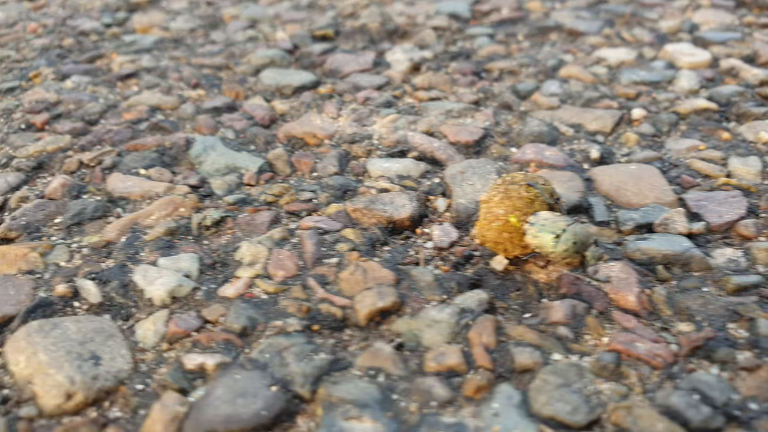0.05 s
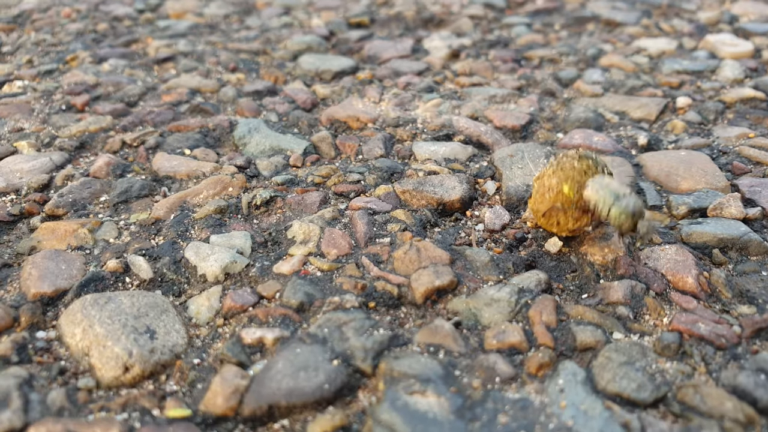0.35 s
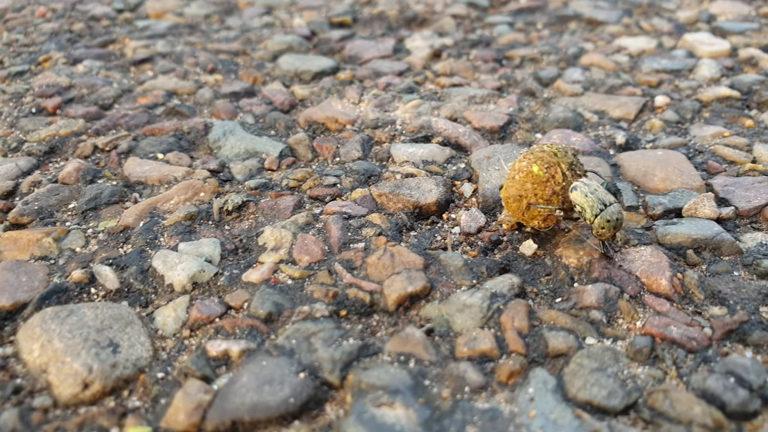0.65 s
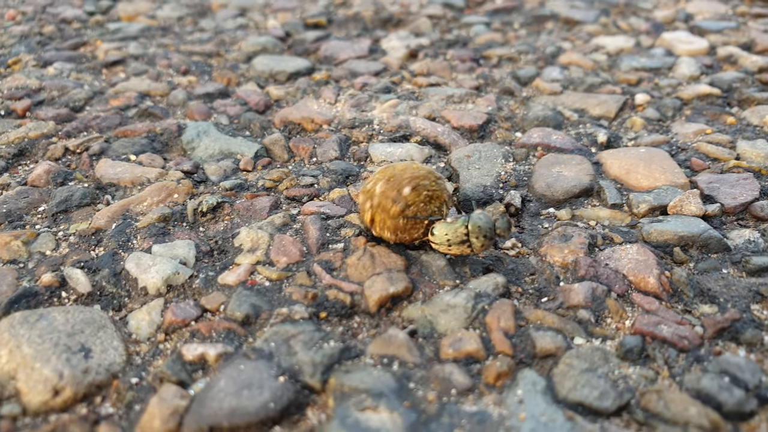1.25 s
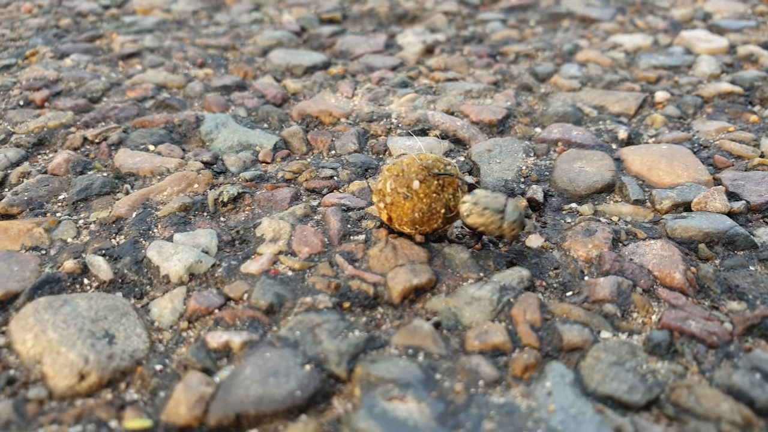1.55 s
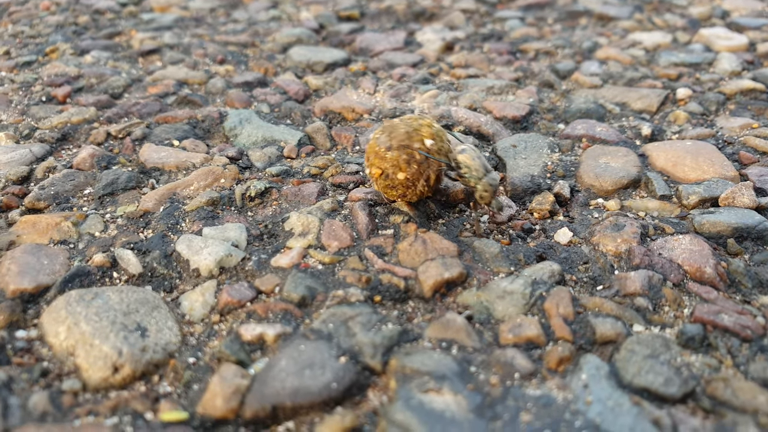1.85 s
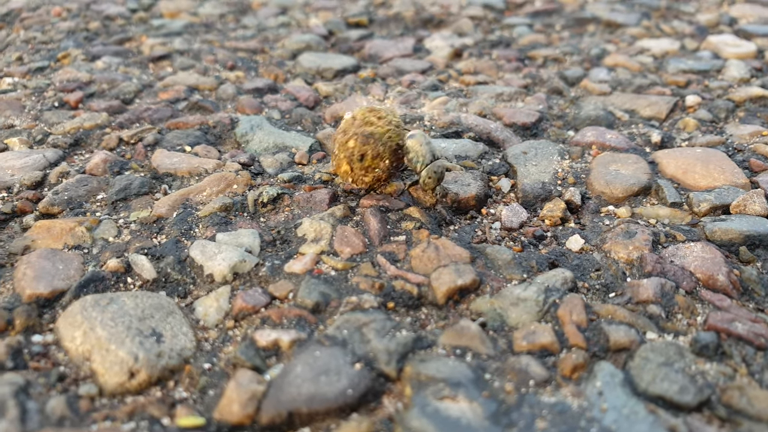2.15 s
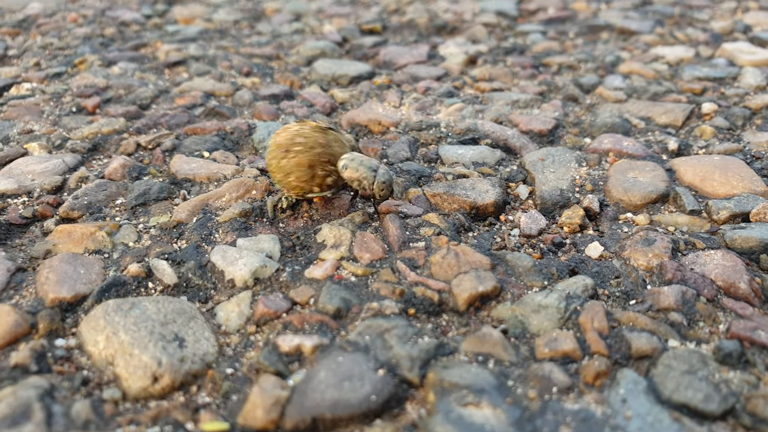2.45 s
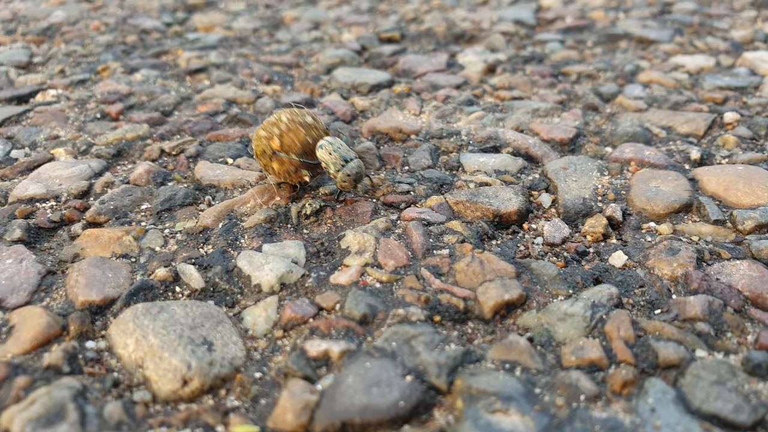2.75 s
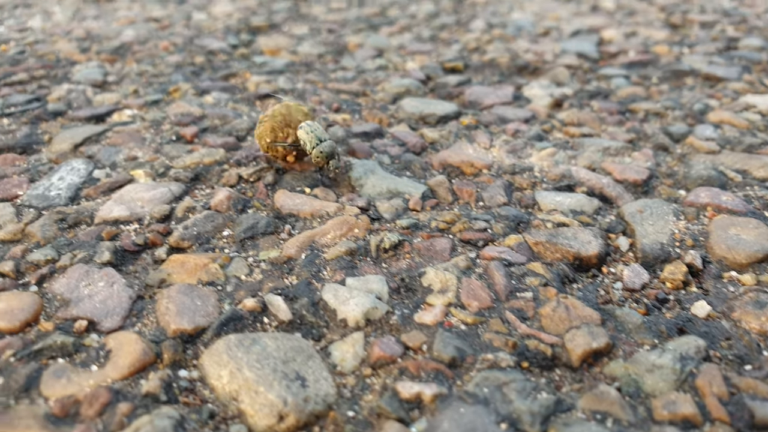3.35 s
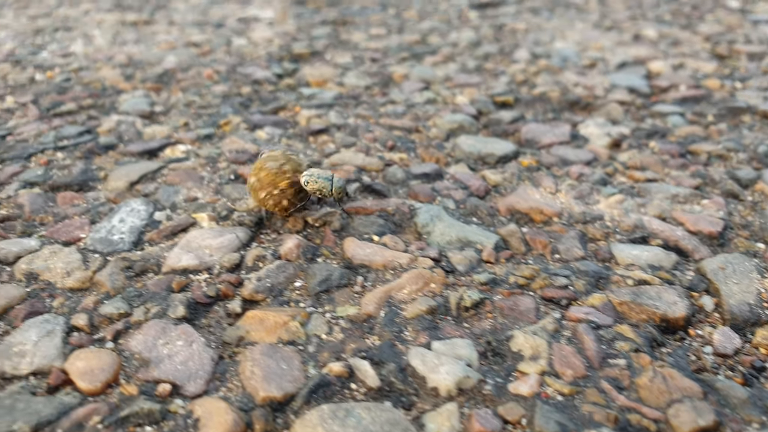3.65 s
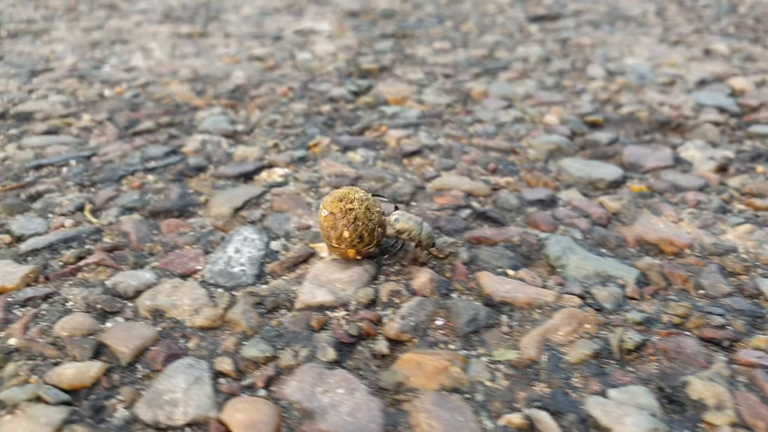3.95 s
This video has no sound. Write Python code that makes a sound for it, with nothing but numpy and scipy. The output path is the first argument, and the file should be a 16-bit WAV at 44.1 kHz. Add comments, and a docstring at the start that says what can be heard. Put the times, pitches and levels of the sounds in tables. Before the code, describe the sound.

The low, rapid thudding of an approaching engine grows louder with mechanical clatter, tyre noise and a passing whine. Before it builds, a small bird gives quick high chirps and two rising calls. Low microphones catch open-air hiss behind.

```python
"""A slow-running engine approaches on a rough country road, drawing left of two low microphones. Its exhaust
thuds about 32 times a second, once per firing, with mechanical clatter, a passing whine and the roar of tyres
on top. Before it swells, a small bird off to the right whistles a run of short chirps and two rising calls.
Behind lie distant rumble, the open air and far traffic."""
import sys
import numpy as np
from scipy import signal
from scipy.fft import rfft, irfft
from scipy.io import wavfile
from scipy.ndimage import uniform_filter1d, map_coordinates

SR = 44100
rng = np.random.default_rng(int(sys.argv[2]) if len(sys.argv) > 2 else 0)


def wav_record(signal):
    """Record a signal, one row per channel, as 16-bit PCM in the file named by sys.argv[1]."""
    frames = np.transpose(np.atleast_2d(signal))
    bounded = np.clip(frames, -1, 1)
    # unit amplitude maps onto the largest positive 16-bit level
    quanta = np.round(bounded * 32767).astype(np.int16)
    wavfile.write(sys.argv[1], SR, quanta)


N = 176400

# engine speed (time [s], firing rate [Hz])
FIRING_RATE = [(0, 30.6), (2.2, 30.8), (2.6, 31.55), (3.1, 31.8), (3.6, 32.0), (4, 32.7)]
# the engine drawing near (time [s], exhaust level [dB], clatter level [dB])
APPROACH_LEVELS = [(0, -64.5, -63.5), (1.0, -55, -58.5), (1.85, -54.5, -57), (2.15, -45.5, -49.5),
                   (2.45, -41, -44), (2.85, -36, -39.5), (3.25, -31, -35.5), (3.55, -32.5, -37.5),
                   (4, -30.5, -37)]
# the vehicle's bearing (time [s], lead of the left microphone [ms])
LEFT_LEAD = [(0, .1), (2, .19), (2.9, .28), (3.2, .38), (4, .45)]
# one thud through the silencer (frequency [Hz], relative level [dB])
THUD_SPECTRUM = [(20, -20), (42, -28), (63, 2), (95, -2.5), (128, 0.5), (160, -8), (192, -2), (255, -8),
                 (300, -18), (390, -13.5), (600, -32), (1200, -40), (4000, -64)]
# diffuse exhaust rumble (frequency [Hz], relative level [dB])
RUMBLE_SPECTRUM = [(20, -22), (42, -15.5), (65, -3), (92, -2.5), (130, -9), (200, -8.5), (300, -20.5),
                   (420, -12), (600, -35), (2000, -59)]
# mechanical clatter (frequency [Hz], relative level [dB])
CLATTER_SPECTRUM = [(60, -16), (200, -7), (420, 4.5), (600, -3), (800, 4), (1100, -1), (1550, -2),
                    (2000, 0.5), (2450, -4), (3000, -10.5), (4000, -11.5), (4900, -12), (6400, -19),
                    (7900, -35), (9200, -29), (12000, -26.5), (13500, -36), (15500, -44)]
# direct sound from the road, shared by both microphones (frequency [Hz], coherence [0-1])
ROAD_COHERENCE = [(100, 0.73), (400, 1), (1400, 0.72), (3000, 0.21), (7000, 0.27), (15000, 0.1)]
# tyre roar (frequency [Hz], relative level [dB])
TYRE_SPECTRUM = [(120, -20), (240, -8), (380, 4), (500, -0.5), (620, -2), (900, -6), (1200, -3),
                 (2500, -35.5), (4500, -19), (6000, -48.5)]
# the tyres drawing near (time [s], level [dB])
TYRE_SWELL = [(0, -66), (2.1, -52.5), (2.35, -45.5), (2.55, -47.5), (3.3, -45), (3.7, -39.5), (4, -44)]
# the vehicle's whine (frequency [Hz], width [Hz], relative level [dB])
WHINE_MODES = [(731, 17, -2), (757, 16.5, 5), (742, 140, 0.5), (868, 59, -10)]
# the whine passing (time [s], level [dB])
WHINE_SWELL = [(0, -87), (1.9, -61), (2.3, -49.5), (2.6, -46.5), (2.9, -40.5), (3.2, -38), (3.5, -45),
               (4, -48)]
# short chirps (time of top pitch [s], top pitch [Hz], relative level [dB])
CHIRP_NOTES = [(.095, 5780, -62.5), (.236, 5700, -56.5), (.339, 5640, -54.5), (.444, 5800, -53.5),
               (.532, 5660, -54), (.627, 5700, -55), (.720, 5700, -56.5), (.838, 5760, -61),
               (1.128, 6000, -58.5)]
# one chirp (time from top [s], pitch [ratio], relative level [dB], rasp [share of pitch])
CHIRP_SHAPE = [(-.028, .7, -22, .03), (-.016, .78, -11, .045), (-.007, .94, -12, .035), (0, 1, -3, .015),
               (.007, .945, 0, .012), (.015, .86, -7, .015), (.022, .8, -28, .02)]
# rising calls (time of top pitch [s], top pitch [Hz], relative level [dB])
CALL_NOTES = [(.985, 5700, -54), (1.278, 5670, -55.5)]
# one rising call (time from top [s], pitch [ratio], relative level [dB], rasp [share of pitch])
CALL_SHAPE = [(-.08, .67, -19, 0.014), (-.06, .71, -7.5, 0.015), (-.028, .78, -1, 0.011),
              (-.014, .87, -8, 0.018), (0, 1, -7, .02), (.017, .9, -7.5, 0.022), (.04, 0.75, -17, .03)]
# distant rumble and the open air (frequency [Hz], relative level [dB])
AIR_SPECTRUM = [(20, -18), (42, -22), (64, 3), (90, 2.5), (125, 0), (170, -7), (280, -17), (400, -17),
                (550, -17), (980, -21), (1380, -17), (1600, -28.5), (2200, -27.5), (3200, -31.5),
                (5500, -40), (6600, -46), (7400, -81), (11000, -82), (15000, -71)]
# likeness of diffuse sound at the two microphones (frequency [Hz], coherence [0-1])
AIR_COHERENCE = [(60, .99), (130, 0.99), (290, 0.9), (640, 0.78), (1400, 0.37), (3100, 0.086), (15000, 0)]
# tones of far traffic (frequency [Hz], width [Hz], relative level [dB])
TRAFFIC_MODES = [(941, 32, 5), (1375, 48, -2.5)]
# far traffic coming and going (time [s], level [dB])
TRAFFIC_SWELL = [(0, -61), (.4, -69.5), (.7, -57.5), (1.0, -59.5), (1.3, -75.5), (4, -66)]
# microphone balance (frequency [Hz], left minus right [dB])
MIC_BALANCE = [(60, 1), (400, 1.5), (800, 2), (2400, 1.5), (3400, 1.5), (5000, -7), (6500, 1.5), (8200, 7),
               (15000, 0.5)]


def vehicle(firing_at_s=3.162):
    """Engine and tyres come up the road; as they draw left, the right microphone lags ever more."""
    firings = np.cumsum(curve(FIRING_RATE)[0]) / SR
    firings -= firings[round(firing_at_s * SR)]  # one firing falls at this time
    exhaust_db, clatter_db = curve(APPROACH_LEVELS)
    engine = exhaust(firings, exhaust_db) + clatter(firings, clatter_db)
    left, right = engine + tyres() + whine(WHINE_MODES, WHINE_SWELL)
    lag = curve(LEFT_LEAD)[0] * SR / 1000
    return np.array([left, map_coordinates(right, [np.arange(N) - lag], order=5)])


def exhaust(firings, level_db, spread_db=1.4, jitter_s=0.00026, rumble_db=-4, rumble_follow=0.84):
    """One thud per firing through the silencer, and a diffuse rumble that grows more slowly."""
    onsets = np.flatnonzero(np.diff(np.floor(firings)))
    strength, lateness = rng.standard_normal((len(onsets), 2)).T
    onsets += (lateness * jitter_s * SR).astype(int)
    pulses = np.zeros(N)
    pulses[np.clip(onsets, 0, N - 1)] = -amp(spread_db * strength)
    # minimum phase: the thud starts sharply, then rings out
    cepstrum = irfft(np.log(amp(spectrum(THUD_SPECTRUM, size=8192))))
    log_response = rfft(2 * cepstrum[:4096], 8192) - cepstrum[0]
    thud = irfft(np.exp(log_response))[:4096]
    direct = uneven_burn(signal.fftconvolve(pulses, thud)[:N]) * amp(level_db)
    diffuse_db = level_db.max() + rumble_follow * (level_db - level_db.max()) + rumble_db
    return direct + noise_pair(RUMBLE_SPECTRUM, AIR_COHERENCE) * amp(diffuse_db)


def uneven_burn(thuds, split_hz=124, change_db=0.9):
    """Each firing burns a little differently, so its upper part swells or shrinks."""
    low = signal.sosfiltfilt(signal.butter(2, split_hz, fs=SR, output="sos"), thuds)
    return unit(low + (thuds - low) * amp(change_db * drift(18)))


def clatter(firings, level_db, puff_depth=0.23, puff_cycles=0.21, flutter_db=0.67, treble_hz=7000):
    """Mechanical noise that puffs with each firing; its treble fades with distance."""
    puffs = unit(1 + puff_depth * np.exp(-(firings % 1) / puff_cycles))
    noise = flicker(noise_pair(CLATTER_SPECTRUM, ROAD_COHERENCE)) * puffs
    body = signal.sosfiltfilt(signal.butter(4, treble_hz, fs=SR, output="sos"), noise)
    distance_loss_db = 0.24 * (level_db - level_db.max())
    treble = (noise - body) * amp(distance_loss_db)
    return (body + treble) * amp(level_db + flutter_db * drift(13))


def flicker(noise, depth_db=1.29, size=512):
    """Noise flickers in small patches of time and frequency."""
    frames = signal.stft(noise, nperseg=size)[2]
    patches = uniform_filter1d(rng.standard_normal(frames.shape[1:]), size=3, axis=0)
    patches = uniform_filter1d(patches, size=16, axis=1)
    return signal.istft(frames * amp(depth_db * unit(patches)), nperseg=size)[1][:, :N]


def tyres(bump_db=0.5):
    """Tyres roar unevenly on the coarse road."""
    return noise_pair(TYRE_SPECTRUM, ROAD_COHERENCE) * amp(curve(TYRE_SWELL)[0] - bump_db * drift(3.9))


def whine(modes, swell):
    """Wavering tones of a vehicle, near or far, each a narrow band of noise."""
    tones, t = np.zeros(N), np.arange(N) / SR
    for hz, width, db in modes:
        waver = drift(width / 2) + 1j * drift(width / 2)
        tones += amp(db) * (waver * np.exp(2j * np.pi * hz * t)).real
    return unit(tones) * amp(curve(swell)[0])


def bird(left_db=-6.5, right_db=2, echo_db=-5):
    """Off to the right, a whistle bent into raspy chirps and purer rising calls."""
    song, t = np.zeros(N), np.arange(N) / SR
    for notes, shape in ((CHIRP_NOTES, CHIRP_SHAPE), (CALL_NOTES, CALL_SHAPE)):
        s, ratio, shape_db, rasp = np.transpose(shape)
        for top_s, top_hz, db in notes:
            on = (t > top_s + s[0]) & (t < top_s + s[-1])
            from_top = t[on] - top_s
            wobble = 1 + np.interp(from_top, s, rasp) * drift(700, size=len(from_top))
            hz = top_hz * np.interp(from_top, s, ratio) * wobble
            envelope = amp(db + np.interp(from_top, s, shape_db))
            song[on] += envelope * np.sin(2 * np.pi * np.cumsum(hz) / SR)
    return (song + amp(echo_db) * reflections(song)) * amp([[left_db], [right_db]])


def reflections(sound, t60_s=0.32, density=0.05):
    """Sparse outdoor reflections, different at each microphone."""
    t = np.arange(SR // 2) / SR
    taps = rng.standard_normal((2, len(t))) * (rng.random((2, len(t))) < density)
    taps *= amp(-60 * t / t60_s)
    taps /= np.linalg.norm(taps, axis=1)[:, None]
    return signal.fftconvolve(sound[None], taps, axes=1)[:, :N]


def background(air_db=-46.5, swell_db=1.02):
    """Distant rumble, the open air and the faint singing of far traffic."""
    air = noise_pair(AIR_SPECTRUM, AIR_COHERENCE) * amp(air_db + swell_db * drift(5.6))
    return air + whine(TRAFFIC_MODES, TRAFFIC_SWELL)


def noise_pair(colour, coherence):
    """Coloured noise, partly shared by the two microphones."""
    left, separate = rfft(rng.standard_normal((2, N)))
    shared = np.clip(spectrum(coherence), -1, 1)
    right = shared * left + np.sqrt(1 - shared ** 2) * separate
    return unit(irfft(np.array([left, right]) * amp(spectrum(colour)), N))


def drift(hz, size=N):
    """Random wander of rms about 1, up to the given rate."""
    rolloff = 1 + (np.fft.rfftfreq(N, 1 / SR) / hz) ** 4
    return unit(irfft(rfft(rng.standard_normal(N)) / rolloff, N))[:size]


def curve(table):
    """Each column of a time table, sample by sample."""
    s, *columns = np.transpose(table)
    return [np.interp(np.arange(N) / SR, s, c) for c in columns]


def spectrum(table, size=N):
    """A frequency table read at every FFT bin."""
    hz, value = np.transpose(table)
    return np.interp(np.log(np.fft.rfftfreq(size, 1 / SR) + 1), np.log(hz), value)


def amp(db):
    """Decibels to gain."""
    return 10 ** (np.asarray(db) / 20)


def unit(x):
    """Scales to rms 1."""
    return x / np.sqrt(np.mean(x ** 2) + 1e-20)


def scene():
    """Vehicle, bird and open air, heard from near the ground."""
    return vehicle() + bird() + background()


def record(dry, start_s=0.068, edge_hz=15720):
    """The microphone pair: left-right balance, a silent lead-in and the band limit."""
    tilt_db = spectrum(MIC_BALANCE) / 2
    heard = irfft(rfft(dry) * amp([tilt_db, -tilt_db]), N)
    heard *= np.arange(N) / SR > start_s
    lowpass = signal.firwin(511, edge_hz, window=("kaiser", 9), fs=SR)
    return signal.oaconvolve(heard, lowpass[None], "same")


dry = scene()
out = record(dry)
wav_record(out)
```